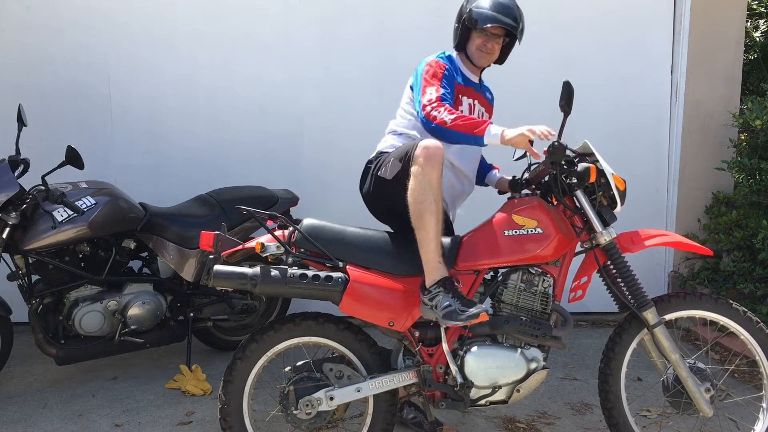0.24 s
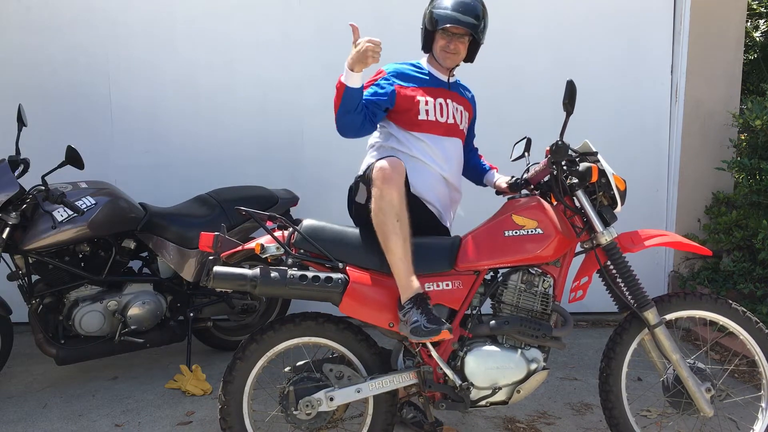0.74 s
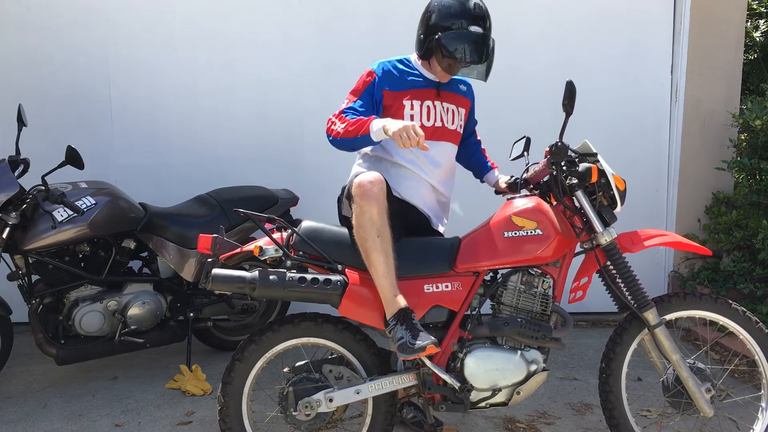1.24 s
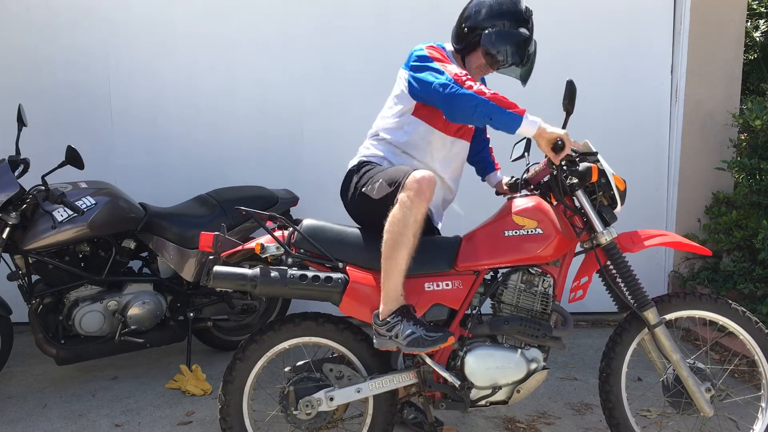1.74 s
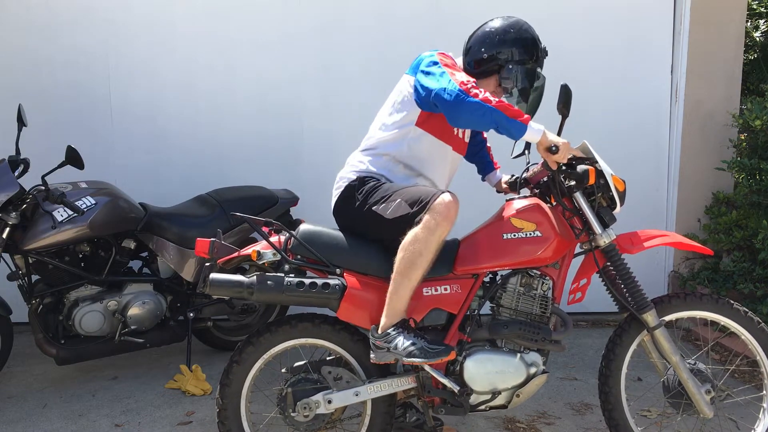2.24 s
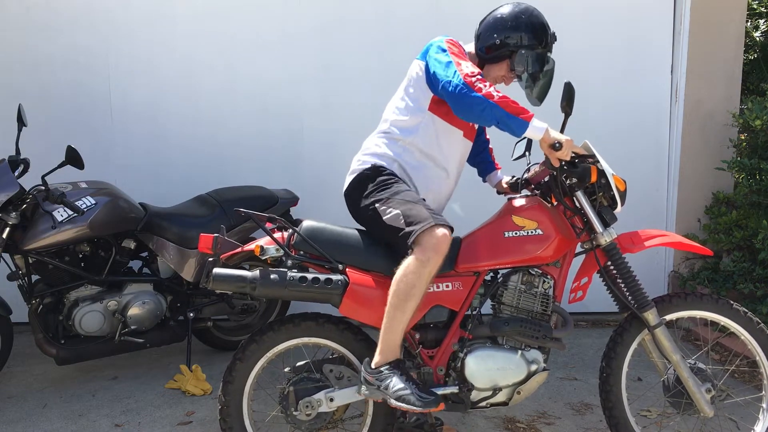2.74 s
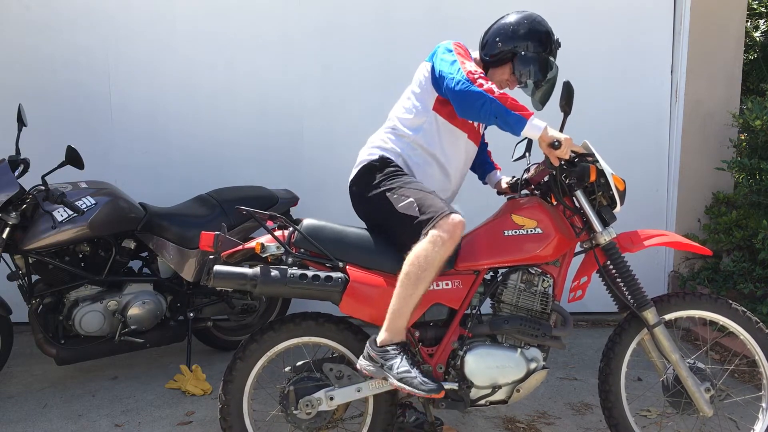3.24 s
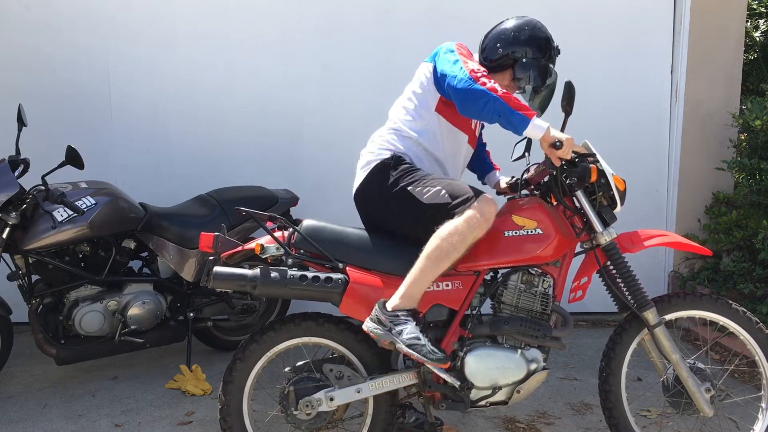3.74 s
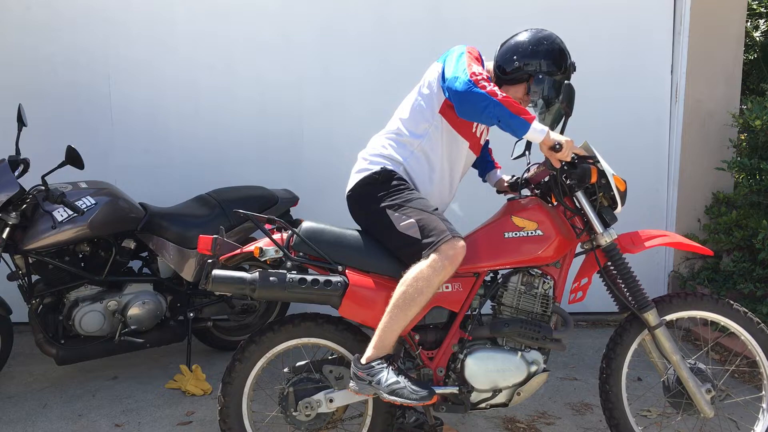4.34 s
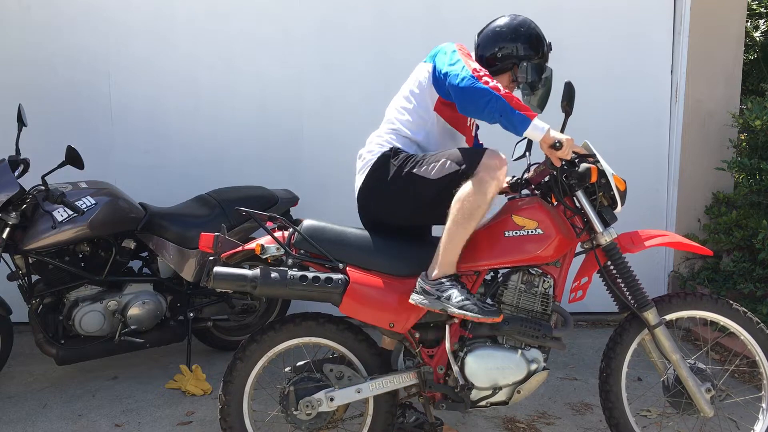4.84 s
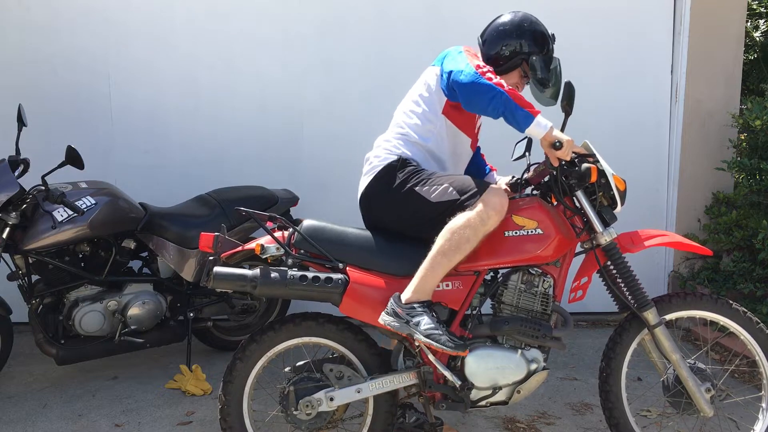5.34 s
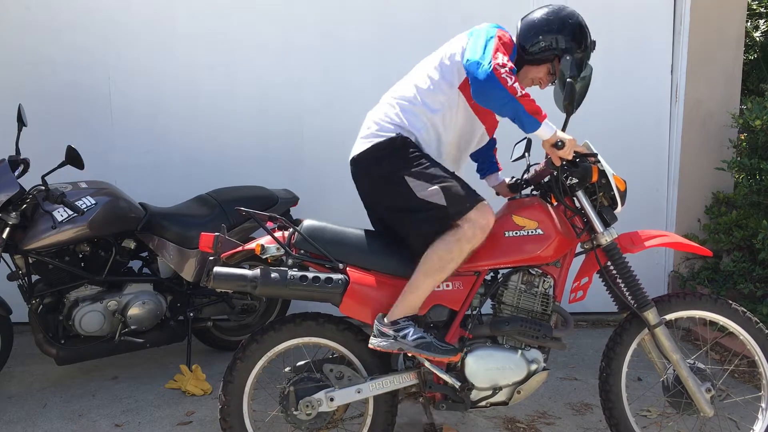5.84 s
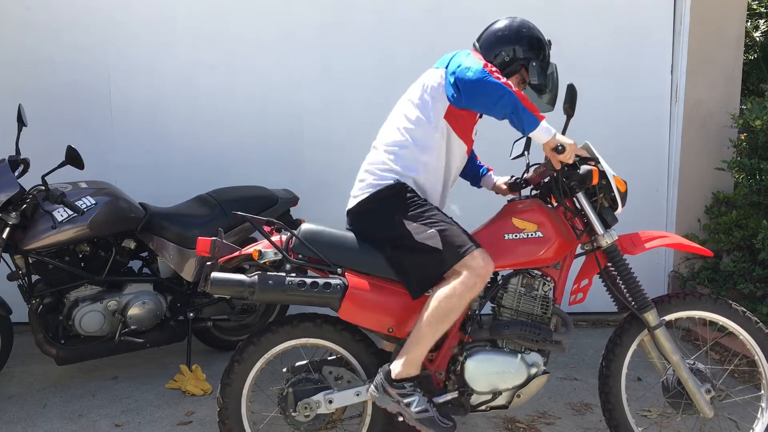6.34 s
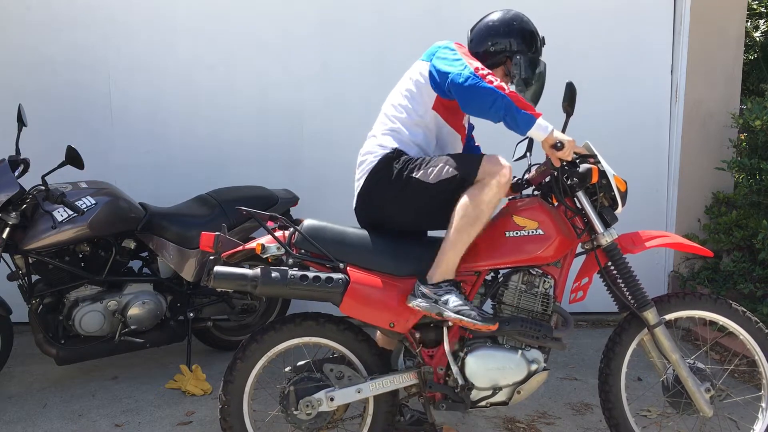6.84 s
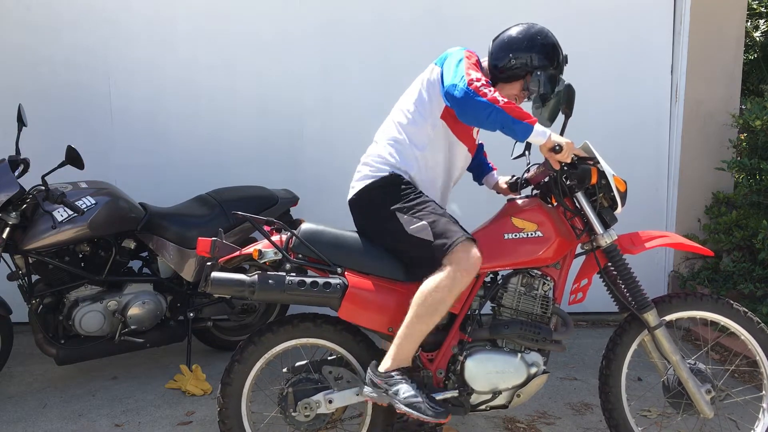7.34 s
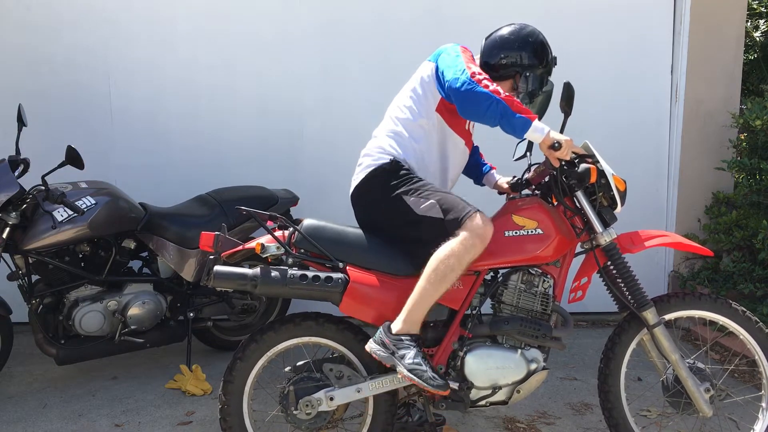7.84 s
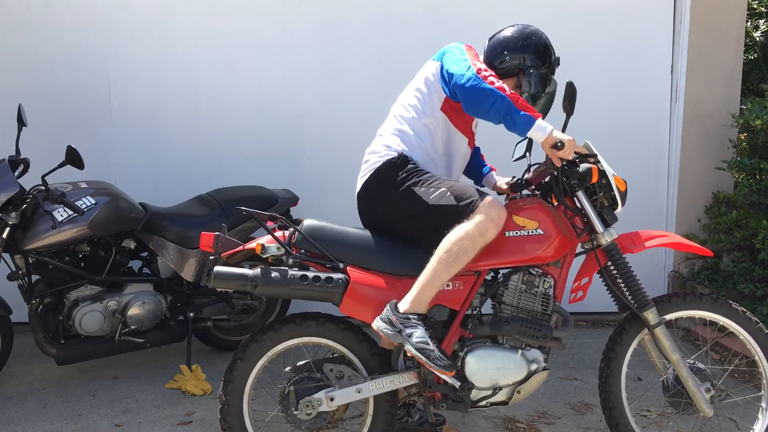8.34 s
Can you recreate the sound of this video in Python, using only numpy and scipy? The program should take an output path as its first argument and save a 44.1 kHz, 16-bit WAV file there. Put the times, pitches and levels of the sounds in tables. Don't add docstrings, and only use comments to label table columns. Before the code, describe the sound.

Close, dry outdoor sound beside a garage door. After over two seconds of soft ticks, scuffs and distant hum, a cold motorcycle is kicked over four times. Each stroke gives a bright clack, a muffled puff and a clicking return ending in a hard steel snap; the third is by far the loudest. Wind flutters deeply against the microphone, and the engine stays dead.

```python
import sys
import numpy as np
from scipy import signal
from scipy.fft import rfft, irfft, next_fast_len
from scipy.io import wavfile
from scipy.ndimage import uniform_filter1d, map_coordinates

SR = 44100
rng = np.random.default_rng(int(sys.argv[2]) if len(sys.argv) > 2 else 0)


def put_to_file(sound):
    columns = np.atleast_2d(sound).T
    safe = np.clip(columns, -1, 1)
    whole_steps = np.round(safe * 32767)
    wavfile.write(sys.argv[1], SR, whole_steps.astype(np.int16))


def level_to_linear(level):
    exponent = np.asarray(level, float) / 20
    return 10 ** exponent


N = 379260

# frequency in Hz, level in dB per Hz.
TOWN_COLOUR = [(53, -60), (90, -4.5), (162, -6.5), (273, -14), (440, -17.5), (800, -21), (1340, -26.5),
               (2200, -34), (3100, -34), (5200, -35), (6000, -46.5), (9000, -47), (15500, -52),
               (16500, -77)]
# time in seconds, strength in dB.
BREEZE = [(0, -53), (.3, -52), (1.2, -63), (1.7, -40.5), (2.8, -46.5), (3.6, -24.5), (4.2, -23.5),
          (4.5, -29), (5.15, -44), (5.5, -23.5), (6.0, -30.5), (6.45, -34), (7.0, -25.5), (7.6, -28.5),
          (8.6, -19)]
# peak time in seconds, peak in dB, half length in seconds.
GUSTS = [(.55, -37, .04), (.97, -39, 0.09), (1.55, -55, 0.027), (1.94, -28.5, 0.086), (2.15, -29.5, 0.034),
         (2.36, -33, 0.057), (2.7, -39, 0.084), (3.3, -32, 0.058), (3.9, -8.5, 0.032), (4.3, -29, 0.047),
         (4.9, -25, 0.068), (5.31, -23, 0.074), (5.69, -23, 0.026), (6.15, -17.5, 0.061),
         (6.71, -15.5, .09), (6.98, -22, 0.031), (7.4, -27.5, 0.078), (8.24, -37.5, 0.061),
         (8.48, -31, 0.053)]
# peak time in seconds, peak in dB, half length in seconds.
SWELLS = [(.3, -28.5, .1), (.85, -21, 0.18), (1.1, -24, 0.023), (1.65, -23.5, 0.067), (2.15, -17.5, 0.085),
          (2.36, -18.5, 0.034), (2.57, -17, 0.017), (2.9, -30, 0.034), (3.32, -21, 0.017),
          (3.8, -17.5, 0.24), (4.15, -16, 0.22), (4.9, -22.5, 0.14), (5.31, -13.5, 0.079),
          (5.83, -17, 0.11), (6.3, -27, 0.39), (6.84, -5.5, 0.064), (7.62, -25.5, 0.22), (8.36, -10, 0.075),
          (8.53, -18, 0.041)]
# frequency in Hz, level in dB per Hz.
HEAVE_COLOUR = [(1.5, -43), (3, -2), (14, -2.5), (22, -36.5), (40, -120)]
# frequency in Hz, level in dB per Hz.
BUFFET_COLOUR = [(8, -120), (15, -21), (21, 3.5), (30, -7), (42, -21.5), (60, -26), (100, -120)]
# frequency in Hz, level in dB per Hz.
FLUTTER_COLOUR = [(24, -58), (40, -14.5), (51, 1.5), (114, -24.5), (183, -55), (260, -75), (440, -120)]

# start in seconds, peak in dB, centre in Hz, dull part in dB.
TICKS = [(.1544, -53, 980, -6), (.3496, -47.5, 786, -7.5), (1.141, -41.5, 1360, -1.5),
         (1.652, -53, 3410, -9.5), (1.6935, -47, 1280, -30.5), (2.4079, -41.5, 2200, -4),
         (3.5444, -37.5, 740, -16), (3.6094, -45, 740, -7), (3.6596, -41, 751, -8), (3.7304, -28, 1040, -6),
         (3.7708, -26, 1120, -15), (4.866, -35.5, 1900, -12), (5.0699, -36.5, 1860, -11.5),
         (5.1253, -34, 1105, -2.5), (5.1627, -34, 740, -9.5), (5.3991, -45.5, 770, -13),
         (5.658, -49.5, 940, -16.5), (5.686, -49.5, 740, -10), (6.7044, -24, 745, -15),
         (6.8668, -44, 748, -3), (6.9301, -35.5, 1290, -14), (7.0174, -32.5, 1030, -12.5),
         (7.0823, -45.5, 778, -9.5), (8.1094, -34, 990, -7.5), (8.2626, -38, 1280, -29),
         (8.3165, -37.5, 1010, -20.5), (8.3898, -28.5, 1140, -3.5)]
# start in seconds, peak in dB, centre in Hz, dull part in dB.
SCUFFS = [
    (1.128, -50, 1600, -10.5),
    (1.145, -44.5, 1380, 8),
    (1.868, -43, 5000, -17.5),
    (1.9, -52, 1100, -10.5),
    (2.022, -44.5, 1130, -6),
    (2.042, -46, 1200, -15),
    (2.546, -41, 4300, -2.5),
    (5.958, -36.5, 4020, 14),
    (7.18, -41, 2500, 6.5),
    (7.221, -32, 4380, -2.5),
]
# start in seconds, peak in dB, centre in Hz, dull part in dB.
STROKES = [(2.5944, -27, 1547, -22), (2.6, -13, 3810, -39), (4.1104, -26, 1500, -26),
           (4.1118, -13.5, 4094, -23.5), (6.0037, 1, 1735, -14), (6.0122, -4.5, 4440, -12),
           (6.112, -8, 5280, -15), (6.1494, -25, 2180, -3.5), (6.1894, -26, 1512, 1),
           (6.2383, -26, 3845, -2), (6.2635, -22.5, 1625, -4), (7.2509, -11.5, 3880, -31)]
# start in seconds, peak in dB, centre in Hz, dull part in dB.
PAWL_CLICKS = [(3.2086, -39, 2320, -1.5), (3.3687, -23, 2200, -9.5), (3.4381, -19.5, 2200, -19.5),
               (4.6019, -42.5, 3600, 2.5), (4.6982, -27, 2200, -10.5), (4.7755, -26.5, 1820, -19.5),
               (6.4113, -25.5, 2000, -14), (6.4882, -25.5, 1740, -11), (6.563, -26.5, 2200, -8.5),
               (6.6278, -27.5, 4106, -8.5), (7.7987, -34, 2360, -19.5), (7.9119, -28.5, 1880, -9),
               (7.9848, -20, 3630, -20.5)]
# start in seconds, peak in dB, centre in Hz, dull part in dB.
STOPS = [
    (3.5025, -9.5, 3400, -11),
    (4.8234, -9, 3840, -30),
    (6.6715, -7.5, 3520, -31.5),
    (8.0627, -7.5, 3464, -25),
]

# frequency in Hz, level in dB, t60 in seconds.
FRAME_MODES = [(622, -7.5, .15), (798, -2.5, 0.16), (1084, -2, 0.14), (1290, -3, 0.36), (1600, -5, .1),
               (2720, -6, .08)]
# frequency in Hz, level in dB, t60 in seconds.
CASE_MODES = [(646, -2.5, 0.039), (733, -2.5, 0.095), (1280, -10.5, 0.12), (1676, -3.5, .06),
              (1830, -9.5, 0.034), (2200, -3.5, .07), (3830, -4.5, 0.07), (3930, -10, 0.072),
              (4440, -13.5, 0.097), (5200, 7.5, 0.19)]
# frequency in Hz, level in dB, t60 in seconds.
STEEL_MODES = [(754, -5, .15), (1010, -5, .07), (1195, -8, .07), (1560, -6, .06), (2200, -5, .05),
               (2780, -7, .04), (3300, -3, .035), (3700, -3, .035), (4100, -3, .04), (4440, -9, .035)]
# frequency in Hz, level in dB per Hz.
CRACK_COLOUR = [(180, -64), (300, -21), (900, -12), (1010, -3.5), (1190, -6), (1580, -4.5), (1780, -5),
                (2790, -7.5), (3520, -5), (6850, -12.5), (10900, -12), (15700, -28.5), (16400, -48)]
# frequency in Hz, factor on a contact's t60.
FADE = [(300, 2.3), (1500, 0.57), (5000, 0.76), (12000, 0.63)]

# start in seconds, length in seconds, starting pitch in Hz, level in dB.
CHIRPS = [(0.207, .021, 5000, -61), (.473, 0.046, 3200, -64), (0.602, 0.038, 3100, -64),
          (0.72, 0.075, 4650, -62), (0.962, 0.043, 3320, -63), (1.372, .031, 4550, -60),
          (1.402, 0.038, 3400, -60), (1.49, .06, 4530, -65), (2.326, 0.03, 5200, -55.5),
          (2.332, 0.023, 3560, -58), (2.986, .041, 4570, -52.5)]
# start in seconds, level in dB, pitch in Hz, t60 in seconds.
PANELS = [
    (1.143, -44, 1325, 0.13),
    (3.73, -35, 1007, 0.11),
    (6.004, -23.5, 144.7, 0.26),
    (6.006, -22, 646, 0.23),
    (6.113, -29, 5210, 0.13),
    (6.267, -31.5, 1048, 0.12),
    (6.705, -29.5, 738, 0.14),
    (7.255, -39.5, 315, 0.42),
    (8.064, -32.5, 1010, 0.12),
]
# start in seconds, length in seconds, rub in dB, rustle in dB.
MOVES = [(1.562, 0.88, -71.5, -73.5), (2.52, 0.083, -63, -69), (2.697, 0.34, -68, -82.5),
         (3.413, 0.14, -58.5, -87), (3.59, 0.7, -64, -83), (4.778, 0.05, -55.5, -80),
         (4.944, 0.44, -71, -84), (5.4, 0.7, -74, -81), (6.024, .1, -47, -74.5), (6.17, .1, -49, -61),
         (6.54, 0.24, -58.5, -67), (6.954, 0.51, -62, -82), (7.6, 0.27, -70.5, -76.5),
         (8.015, 0.078, -54, -82), (8.181, 0.31, -64.5, -96)]
# frequency in Hz, level in dB per Hz.
RUB_COLOUR = [(880, -15.5), (1500, -3.5), (2180, -9), (2680, -13.5), (3930, -10.5), (6150, -21.5),
              (14000, -44)]
# frequency in Hz, level in dB per Hz.
WEAVE_COLOUR = [(3000, -59), (5500, -7), (7000, -3.5), (11000, -1), (16000, -9.5)]
# start in seconds, peak in dB, t60 in seconds.
PUFFS = [(2.56, -38.5, 0.53), (2.619, -43, 0.32), (3.789, -37, 0.23), (4.059, -39, 0.2), (4.119, -37, 0.25),
         (5.179, -33.5, 0.094), (6.004, -10, 0.2), (6.049, -25, 0.14), (6.108, -21.5, 0.3),
         (6.189, -41, 0.49), (6.269, -36, 0.2), (7.02, -47.5, 0.63), (7.243, -31.5, 0.56),
         (7.299, -43, 0.15), (7.809, -46.5, 0.44), (8.389, -37.5, 0.26)]
# frequency in Hz, width in Hz, level in dB.
PIPE = [(139, 30, -6), (315, 120, -4), (491, 10, 0.5), (745, 180, -3)]
# start in seconds, length in seconds, wheeze in dB.
HOLDS = [
    (2.75, 0.53, -77),
    (3.75, 0.16, -60.5),
    (4.15, 0.15, -59.5),
    (6.17, 0.092, -62),
    (7.5, 0.21, -64),
    (8.02, 0.16, -74),
]
# frequency in Hz, width in Hz, level in dB.
VALVE_GAP = [(1320, 100, -0.5), (1610, 90, -0.5), (1900, 70, 0), (2320, 460, -6), (3400, 70, -3)]


def unit(x):
    return x / np.sqrt(np.mean(x ** 2) + 1e-20)


def along(points, hz):
    f, v = np.transpose(points)
    return np.interp(np.log(hz + 1), np.log(f + 1), v)


def wander(t, rate):
    knots = rng.standard_normal(int(t[-1] * rate) + 4)
    return map_coordinates(knots, [t * rate])


def wobble(rate):
    return wander(np.arange(N) / SR, rate)


def filtered(x, response):
    m = next_fast_len(len(x) + 8192)
    return irfft(rfft(x, m) * response(np.fft.rfftfreq(m, 1 / SR)), m)[:len(x)]


def noise(colour):
    return unit(filtered(rng.standard_normal(N), lambda hz: level_to_linear(along(colour, hz))))


def resonances(peaks):
    def response(f):
        total = 0
        for k, (centre, width, db) in enumerate(peaks):
            band = 1j * f * width / (centre ** 2 - f ** 2 + 1j * f * width)
            total = total + (-1) ** k * level_to_linear(db) * band
        return total
    return response


def add(track, s, sound):
    part = track[round(s * SR):][:len(sound)]
    part += sound[:len(part)]


def smooth(shape, rows):
    t = np.arange(0, N + 32, 32) / SR
    return np.interp(np.arange(N) / SR, t, sum(shape(t, *row) for row in rows))


def humps(rows):
    return smooth(lambda t, s, db, half: level_to_linear(db) * np.exp(-((t - s) / half) ** 2), rows)


def held(rows, rise_s, fall_s):
    def shape(t, s, long, db):
        nearest_edge = np.minimum((t - s) / rise_s, (s + long - t) / fall_s)
        return level_to_linear(db) * np.exp(np.minimum(nearest_edge, 0))
    return smooth(shape, rows)


def breeze_db():
    s, db = np.transpose(BREEZE)
    return np.interp(np.arange(N) / SR, s, db)


def town():
    level_db = -56.5 + 0.028 * (breeze_db() + 23) + 0.91 * wobble(8)
    return level_to_linear(level_db) * noise(TOWN_COLOUR)


def steady(colour):
    lumps = noise(colour)
    power = np.abs(uniform_filter1d(lumps ** 2, size=SR // 5))
    return unit(lumps / (power + .05) ** .4)


def wind():
    gust_db = 20 * np.log10(level_to_linear(breeze_db()) + humps(GUSTS))
    heave = (level_to_linear(-26.5) + humps(SWELLS)) * steady(HEAVE_COLOUR)
    buffet = level_to_linear(gust_db) * steady(BUFFET_COLOUR)
    flutter_db = -44 + 0.6 * (gust_db + 28)
    flutter = level_to_linear(flutter_db) * unit(level_to_linear(1.2 * wobble(6.0)) * noise(FLUTTER_COLOUR))
    return heave + buffet + flutter


def contacts(rows, modes, treble_db, per_dull, per_peak, ring_s, per_octave,
             blow_s, crack_db, ring_db, tail_db, rise_s, focus_db, lead_db):
    out, t = np.zeros(N), np.arange(SR // 2) / SR
    _, usual_db, usual_hz, usual_dull_db = np.mean(rows, axis=0)
    for s, db, centre_hz, dull_db in rows:
        bright_db = treble_db + per_dull * (dull_db - usual_dull_db) + per_peak * (db - usual_db)
        t60 = ring_s * (centre_hz / usual_hz) ** per_octave
        knee_hz = np.clip(1.97 * centre_hz, 1500, 5600)
        slope = [(700, dull_db + 17.0), (1400, 0), (knee_hz, 0), (7500, bright_db + 12.0)]

        def focus(hz):
            return focus_db * np.exp(-(np.log((hz + 1) / centre_hz) / 0.26) ** 2)

        hz, frames, z = signal.stft(rng.standard_normal(len(t)), SR, nperseg=128)
        decay = level_to_linear(-60 * frames / (t60 * along(FADE, hz)[:, None]))
        tail = signal.istft(z * decay, SR, nperseg=128)[1][:len(t)]
        tail *= level_to_linear(2.3 * wander(t, 450))

        crack = np.diff(rng.standard_normal(len(t) + 1)) * level_to_linear(crack_db - 60 * t / 0.0074)
        blow = rng.standard_normal(len(t)) * level_to_linear(-60 * t / blow_s) + crack
        strike = blow + level_to_linear(tail_db) * tail

        ring = np.zeros(len(t))
        for f, level, long in modes:
            mode_db = level + focus(f) + rng.normal(0, 2.5)
            pitch = f * (1 + rng.normal(0, .01))
            ring += level_to_linear(mode_db - 60 * t / min(long, 240 / f)) * np.sin(2 * np.pi * pitch * t)
        ring = signal.fftconvolve(ring, strike[:2500])[:len(t)]

        rough = filtered(strike, lambda hz: level_to_linear(along(CRACK_COLOUR, hz) + focus(hz) + along(slope, hz)))
        sound = rough / np.abs(rough).max() + level_to_linear(ring_db) * ring / np.abs(ring).max()
        add(out, s, level_to_linear(db) * sound * (1 - np.exp(-t / rise_s)))
        scrape = sound[:260][::-1] * np.linspace(0, 1, 260) ** 2
        add(out, s - len(scrape) / SR, level_to_linear(db + lead_db) * scrape)
    return out


def ticks():
    return level_to_linear(2.5) * contacts(
        TICKS, FRAME_MODES, treble_db=-36, per_dull=-0.05, per_peak=-0.18, ring_s=0.21, per_octave=-0.2,
        blow_s=0.04, crack_db=-5.0, ring_db=-13.5, tail_db=-10.5, rise_s=0.00064, focus_db=2, lead_db=-3)


def birds():
    out = np.zeros(N)
    for s, long, start_hz, db in CHIRPS:
        u = np.linspace(0, 1, round(1.4 * long * SR))
        hz = start_hz * (1 - 0.048 * u) + 170 * wander(u * long, 1100)
        rasp = level_to_linear(4 * wander(u * long, 400))
        tone = np.sin(2 * np.pi * np.cumsum(hz) / SR)
        add(out, s, level_to_linear(db - 7) * rasp * np.sin(np.pi * u) * tone)
    return out


def scuffs():
    return level_to_linear(4.0) * contacts(
        SCUFFS, FRAME_MODES, treble_db=-34, per_dull=-1.1, per_peak=0.7, ring_s=0.39, per_octave=0.1,
        blow_s=0.049, crack_db=-21.5, ring_db=-13.5, tail_db=-2.0, rise_s=0.0027, focus_db=7.5, lead_db=-11)


def panels():
    out, t = np.zeros(N), np.arange(SR // 2) / SR
    for s, db, hz, t60 in PANELS:
        shake_db = 3.0 * wander(t, 90)
        swell = 1 - np.exp(-t / .004)
        add(out, s, level_to_linear(db + shake_db - 60 * t / t60) * np.sin(2 * np.pi * hz * t) * swell)
    return out


def moving(rows):
    return held(rows, rise_s=0.041, fall_s=0.068)


def rub():
    gain = moving([(s, long, rub_db) for s, long, rub_db, _ in MOVES])
    return gain * level_to_linear(1.8 * wobble(40)) * noise(RUB_COLOUR)


def clothes():
    gain = moving([(s, long, rustle_db) for s, long, _, rustle_db in MOVES])
    grain = unit(level_to_linear(4 * wobble(120)) * noise(WEAVE_COLOUR))
    return level_to_linear(-7.0) * gain * grain


def puffs():
    push, t = np.zeros(N), np.arange(SR // 2) / SR
    for s, db, t60 in PUFFS:
        add(push, s, level_to_linear(db - 60 * t / t60) * (1 - np.exp(-t / 0.0057)))
    air = filtered(rng.standard_normal(N), resonances(PIPE))
    muffled = filtered(air, lambda hz: 1 / (1 + (hz / 900) ** 2))
    return level_to_linear(-6.5) * push * unit(muffled)


def strokes():
    return level_to_linear(3) * contacts(
        STROKES, CASE_MODES, treble_db=-17, per_dull=-0.22, per_peak=-0.17, ring_s=0.38, per_octave=-0.15,
        blow_s=0.046, crack_db=0.5, ring_db=-17, tail_db=-15.5, rise_s=0.00098, focus_db=4.0, lead_db=-25.5)


def wheeze():
    gap = resonances(VALVE_GAP)
    air = unit(filtered(rng.standard_normal(N), lambda hz: gap(hz) * np.abs(gap(hz))))
    return held(HOLDS, rise_s=.05, fall_s=0.099) * level_to_linear(3 * wobble(26)) * air


def pawl():
    return level_to_linear(2) * contacts(
        PAWL_CLICKS, STEEL_MODES, treble_db=-23, per_dull=-0.2, per_peak=.5, ring_s=0.2367, per_octave=0.33,
        blow_s=0.0366, crack_db=-6, ring_db=-23.5, tail_db=-6.0, rise_s=0.00026, focus_db=5.5, lead_db=-5.5)


def stops():
    return contacts(
        STOPS, STEEL_MODES, treble_db=-17, per_dull=-.05, per_peak=1.8, ring_s=0.2667, per_octave=0.5,
        blow_s=0.015, crack_db=1.5, ring_db=-18, tail_db=-15.5, rise_s=0.00017, focus_db=8.0, lead_db=-32)


def scene():
    surroundings = town() + wind() + birds()
    rider = ticks() + scuffs() + clothes()
    lever = pawl() + stops() + strokes() + panels()
    engine = rub() + puffs() + wheeze()
    return (surroundings + rider + lever + engine)[None]


def roll_off(x):
    return signal.sosfilt(signal.butter(12, 16550, fs=SR, output="sos"), x)


def record(dry):
    limited = dry[0] / (1 + np.abs(dry[0]) ** 12) ** (1 / 12)
    mix = filtered(limited, lambda hz: hz < 16500)[None]
    return roll_off(mix)


dry = scene()
out = record(dry)
put_to_file(out)
```